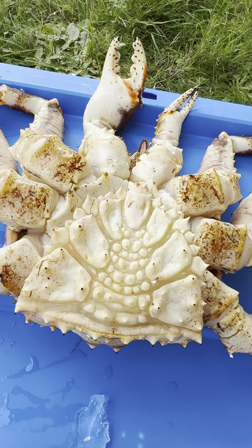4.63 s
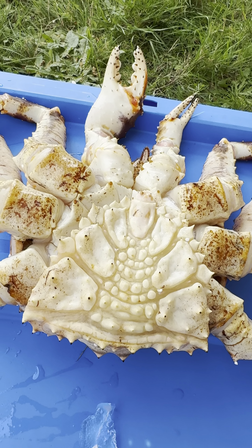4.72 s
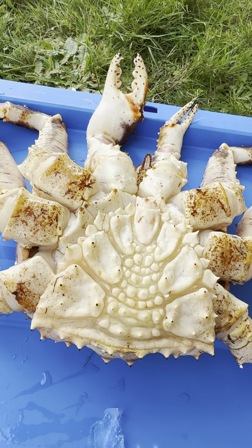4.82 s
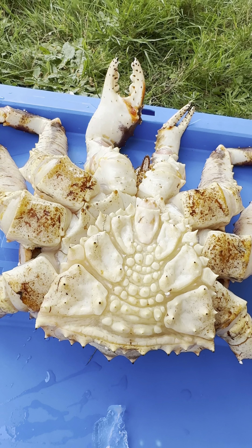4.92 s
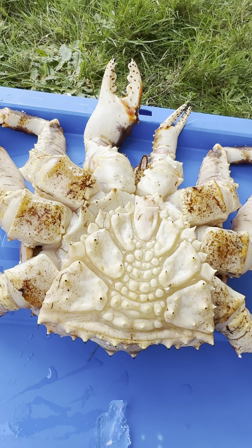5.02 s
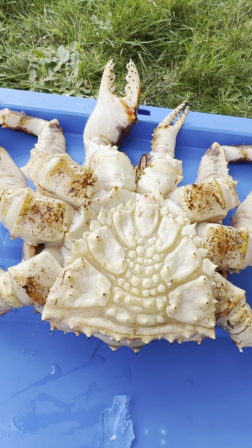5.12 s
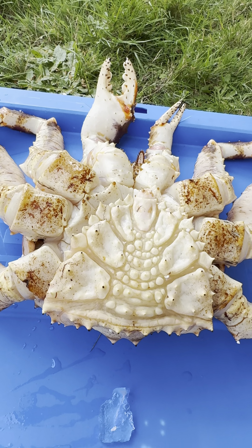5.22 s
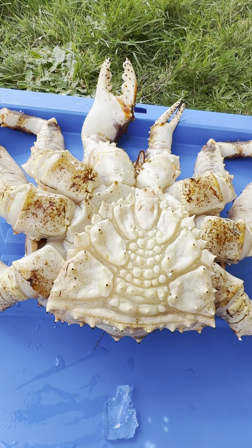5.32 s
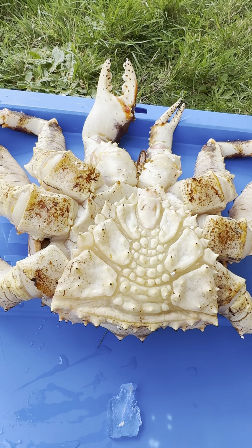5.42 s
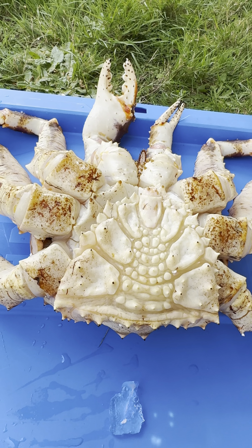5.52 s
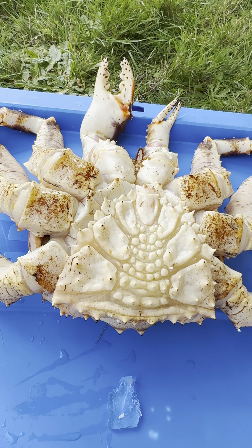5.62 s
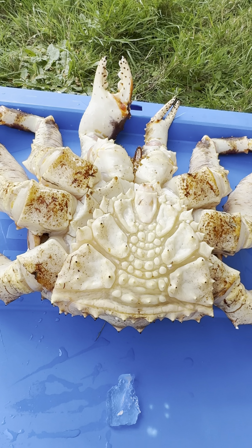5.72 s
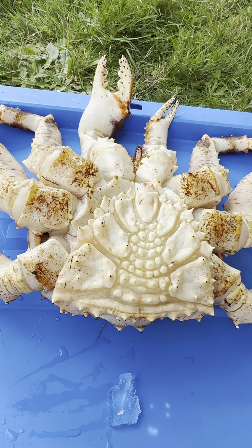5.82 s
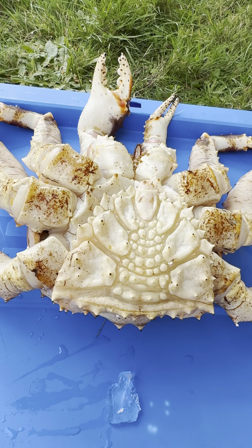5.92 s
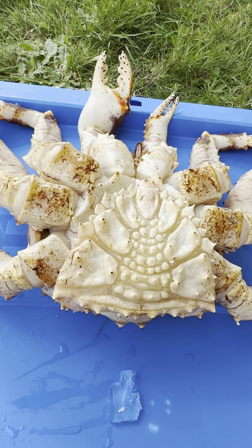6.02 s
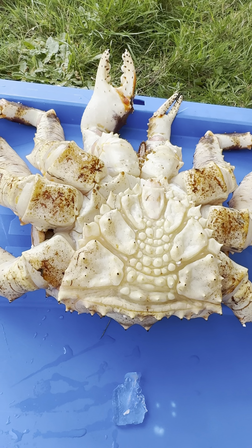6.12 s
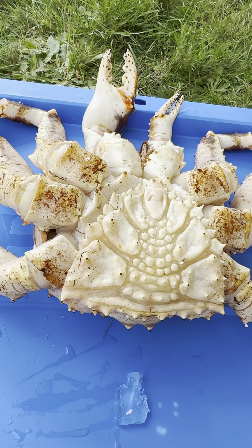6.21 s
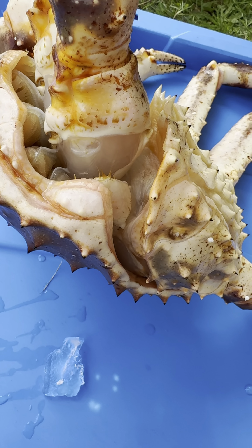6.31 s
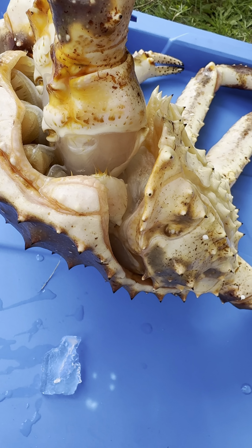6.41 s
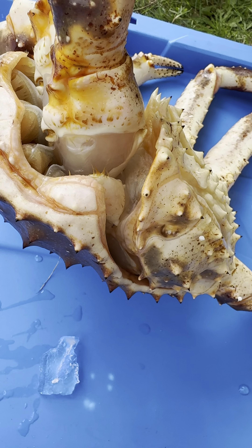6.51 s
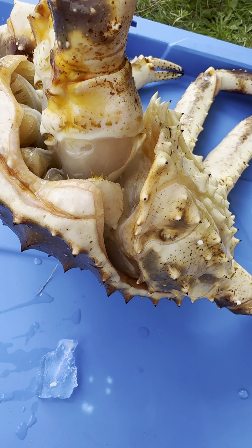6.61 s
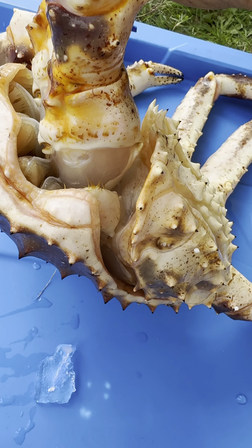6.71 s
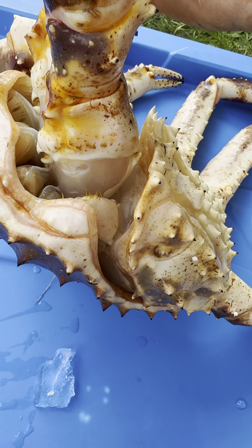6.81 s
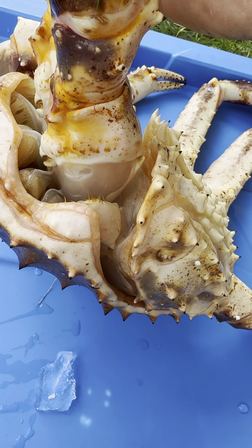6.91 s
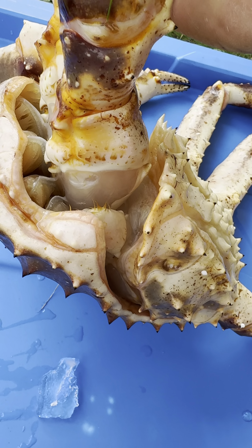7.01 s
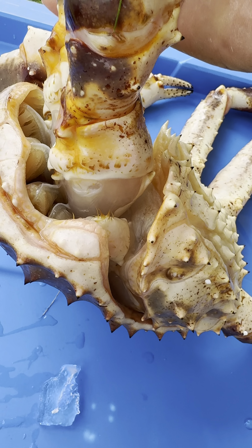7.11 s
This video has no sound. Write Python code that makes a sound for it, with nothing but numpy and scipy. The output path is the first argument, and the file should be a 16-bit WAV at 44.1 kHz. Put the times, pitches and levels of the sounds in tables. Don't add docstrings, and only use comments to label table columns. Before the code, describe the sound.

A loud shell knock opens, followed by more clustered knocks and gritty spine scrapes on a plastic tub, the heaviest near one second. A squeaky rub on the rim follows, then mostly quiet with delicate snaps and wet crackle. Brief softer knocks return after four seconds, bright ticks later. Close stereo phone pickup in open air, low steady machine drone, light hiss and tiny distant bird chips.

```python
import sys
import numpy as np
from scipy import signal
from scipy.fft import rfft, irfft, next_fast_len
from scipy.io import wavfile
from scipy.ndimage import uniform_filter1d, map_coordinates

SR = 44100
rng = np.random.default_rng(int(sys.argv[2]) if len(sys.argv) > 2 else 0)


def store_pcm(level_fs):
    pcm = np.round(np.clip(level_fs, -1, 1) * 32767).astype(np.int16)
    wavfile.write(sys.argv[1], SR, np.atleast_2d(pcm).T)


def field_ratio(decibels):
    return 10 ** (np.asarray(decibels, dtype=float) / 20)


N = 315756


def unit(x):
    return x / np.sqrt(np.mean(x ** 2) + 1e-20)


def along(points, hz):
    point_hz, value = np.transpose(points)
    return np.interp(np.log(hz + 1), np.log(np.abs(point_hz) + 1), value)


def wobble(rate_hz):
    knots = rng.standard_normal(int(N * rate_hz / SR) + 4)
    return map_coordinates(knots, [np.arange(N) * rate_hz / SR])


def filtered(x, response):
    m = next_fast_len(N + 8192)
    return irfft(rfft(x, m) * response(np.fft.rfftfreq(m, 1 / SR)), m)[..., :N]


def resonances(modes, f, scatter_db=0, turn=-1):
    gains = field_ratio(np.transpose(modes)[2] + scatter_db)
    total = 0
    for k, ((hz, width_hz, _), gain) in enumerate(zip(modes, gains)):
        damping = 1j * f * width_hz
        total = total + turn ** k * gain * damping / (hz * hz - f * f + damping)
    return total


def grit(per_s, spread_db):
    slips = (rng.random(N) < per_s / SR) * rng.standard_normal(N)
    return unit(slips * field_ratio(spread_db * rng.exponential(size=N)))


# centre in Hz, narrow width in Hz, wide width in Hz.
WALL_NODES = [(773, 45, 146), (3130, 260, 400), (1640, 110, 147), (483, 37, 100)]


def wall_path(f):
    bend_s, top_hz = .14, 1250
    bend = np.minimum(f, top_hz)
    lag = 4 * np.pi * bend_s * (np.sqrt(bend) - bend / 2 / np.sqrt(top_hz))
    gaps = 1
    for hz, narrow_hz, wide_hz in WALL_NODES:
        off = hz * hz - f * f
        gaps = gaps * (off + 1j * f * abs(narrow_hz)) / (off + 1j * f * abs(wide_hz))
    return gaps, lag


def struck(f, modes, scatter_db, turn):
    above = 1j * f / (1.14 * modes[-1][0])
    below = 1j * f / (.75 * modes[0][0])
    contact = (below / (1 + below)) ** 2 / (1 + 1.2 * above + above ** 2) ** 3
    return resonances(modes, f, scatter_db, turn) * contact


# start in seconds, peak in dB, floor in dB, rim in dB, shell in dB.
KNOCKS = [(0.023, -20.5, -8, -33, -37), (0.0468, -3.5, -18.5, -5.5, -6), (0.0565, -17, -13, 0, -5),
          (0.062, -39, -0.5, -9, -21), (0.2985, -10.5, -16, 6.5, 3.5), (0.317, -35, -8, 13, 9.5),
          (0.898, -18, -10, -12, -15.5), (0.912, -8.5, -14, -24, -15), (0.918, -18, -2, -4, -26),
          (1.010, -21, -0.5, 6.5, -18), (1.029, -14, -6.5, -0.5, -7), (1.041, -21.5, -3, -22, -26),
          (1.1106, -24, -26, 2, -6), (1.153, -25, -3.5, -3.5, -29), (1.175, -26.5, -17, -27, -24),
          (1.8008, -15.5, -34, 0, -9.5), (1.9495, -25.5, -32, -3.5, -21), (4.096, -20.5, -5, -10, -27.5),
          (4.119, -32, -15, 1.5, -18), (4.611, -30.5, -4, 1, -15), (4.651, -24, -8, 0, -14),
          (4.6571, -14.5, -14, -9, -9.5), (4.6739, -21.5, -5.5, -3, -14), (0.560, -52, -20, -10, -16),
          (0.0511, -13, -16, -18, -25), (1.1129, -27, -20, 3, -2), (0.9135, -15, -7, -10, -13),
          (4.099, -26, -5, -6, -28)]
# low over high side mode in dB, low over high rim mode in dB, paths through wall.
KNOCK_SPOTS = [(-25, -3, 0.682), (-4, 15, 1.06), (5, 7, 0.89), (-16, -9, 0.91), (-5, -4, 1.6),
               (-3, -5, 1.05), (16, -1, 0.666), (34, 7, 0.705), (-4, -11, 0.723), (11, 1, 0.915),
               (-10, -15, 0.711), (4, -2, 0.94), (-9, -10, 0.67), (26, -13, 0.665), (-8, 4, 0.644),
               (2.5, -28, 0.548), (-13, -11, 0.44), (7.5, -2, 1.106), (4, 3, 0.92), (13, -11, 0.92),
               (-16, 2, 0.733), (6, 13, 0.902), (2, -7, 0.916), (-13, -10, 0.41), (12, 4, 0.417),
               (-11, 2, 0.464), (-1, 2, 0.403), (5, 7, 0.416)]
# start in seconds, peak in dB, spine
# tips in dB.
TOUCHES = [(0.31, -31.5, -39), (0.561, -59.5, 15), (1.685, -42, -23), (1.704, -36.5, -22), (2, -50, -24),
           (1.761, -41, -7), (2.604, -60, 12), (4.096, -37.5, -2), (4.102, -23, -38), (4.109, -32, -43),
           (4.616, -37, -21), (4.734, -40.5, -29), (0.051, -43, -3), (0.066, -44, -1), (0.319, -43, 3.5),
           (0.919, -35, -5), (0.966, -30, -20), (0.9705, -32, -19), (1.001, -41, -5), (1.031, -29, 0),
           (1.056, -20, -13), (1.1534, -41.5, -9), (1.7103, -44, -10), (1.715, -41, -23), (1.74, -49, -30),
           (1.758, -49, -6), (4.66, -36, -6.5), (4.675, -41, -9), (4.707, -48, -12)]
TOUCH_SPOT = (0.1, 0.11, 0.821)
# centre in Hz, width in Hz, gain in dB.
SIDES = [(333, 200, -4.5), (665, 200, -2.5)]
FLOOR = [(80, 80, -1.5), (146, 200, -2), (250, 244, -0.5)]
RIM = [(912, 390, 3), (1353, 230, 1)]
SHELL = [(1930, 270, 7.5), (2400, 140, 3), (2646, 75, -1.5)]
TIPS = [(3450, 110, -8), (3900, 190, 5), (4580, 210, 10), (5660, 310, 8.5), (6300, 250, -5),
        (6940, 300, 3.5), (7430, 170, 5), (8100, 140, -13), (9000, 320, -12)]


def knocks():
    size = 4096
    out = np.zeros(N + size)
    f, t = np.fft.rfftfreq(size, 1 / SR), np.arange(size) / SR
    gaps, lag = wall_path(f)
    # (modes, dB, t60 s, sign from mode to mode)
    parts = ((SIDES, -1.5, .07, 1), (FLOOR, 4, .2, -1), (RIM, .1, .05, -1), (SHELL, 2.5, .045, 1),
             (TIPS, 6, .035, 1))
    blows = [(*row, -26.5 + .64 * row[-1]) for row in KNOCKS]
    blows += [(s, db, -5, -9.5, 5.5 + .59 * tip_db, tip_db) for s, db, tip_db in TOUCHES]
    spots = KNOCK_SPOTS + [TOUCH_SPOT] * len(TOUCHES)
    for (s, db, *strengths_db), (side_db, rim_db, path) in zip(blows, spots):
        when, force = rng.random((2, 4, 1))
        echoes = field_ratio(-8) * (2 * force - 1) * np.exp(-2j * np.pi * f * (.001 + .007 * when))
        spines = 1 + np.sum(echoes, axis=0)
        late = gaps * spines * np.exp(-1j * abs(path) * lag)
        tilts_db = (side_db, 0, rim_db, 0, 0)
        for (modes, part_db, t60_s, turn), own_db, tilt_db in zip(parts, (0, *strengths_db), tilts_db):
            spread_db = 4 if modes is TIPS else 1.2
            scatter_db = rng.normal(0, spread_db, len(modes)) + tilt_db * np.linspace(.5, -.5, len(modes))
            ring = irfft(struck(f, modes, scatter_db, turn) * late, size) * field_ratio(-60 * t / t60_s)
            out[round(s * SR):][:size] += field_ratio(db + part_db + own_db) * ring / np.abs(ring).max()
    return out[:N]


def stroke(s, rise_s, fall_s):
    gain = np.zeros(N)
    first = max(round((s - 4 * abs(rise_s)) * SR), 0)
    last = min(round((s + 4 * abs(fall_s)) * SR), N)
    at = np.arange(first, last)
    away = np.maximum((s - at / SR) / abs(rise_s), (at / SR - s) / abs(fall_s))
    gain[at] = field_ratio(-22.5 * np.abs(away) ** 1.14)
    return gain


# peak in seconds, rise in seconds,
# fall in seconds, level in dB, sharpness in dB.
SCRAPES = [(0.002, 0.0068, 0.013, -33, -9.5), (0.03, 0.037, 0.065, -37.5, -28),
           (0.089, 0.027, 0.05, -43, -6.5), (0.145, 0.04, 0.029, -44, -4.5),
           (0.297, 0.011, 0.0024, -24, -4), (0.33, 0.0086, 0.1, -56, 8), (0.968, 0.029, 0.033, -33.5, 0),
           (0.982, 0.027, 0.038, -38, 3), (0.996, 0.021, 0.03, -39, 4), (1.008, 0.03, 0.02, -30, 3),
           (1.018, 0.016, 0.012, -34.5, 1), (1.046, 0.0045, 0.018, -36, 5),
           (1.059, 0.0097, 0.01, -30.5, -4.5), (1.184, 0.078, 0.0084, -36.5, -28),
           (1.72, 0.031, 0.034, -41, -11), (1.762, 0.03, 0.074, -54, 10), (1.819, 0.068, 0.054, -36, -10.5),
           (4.127, 0.0045, 0.052, -34, -22), (4.16, 0.027, 0.061, -48, -29), (4.496, 0.03, 0.043, -65, 15),
           (4.543, 0.032, 0.073, -54, -1), (4.617, 0.033, 0.058, -38.5, -13.5),
           (4.69, 0.011, 0.036, -38, -21), (4.88, 0.031, 0.24, -67, 9)]
# peak in seconds, rise in seconds, fall in seconds, level in dB.
LIP_RUBS = [
    (1.689, 0.023, 0.015, -59),
    (1.757, 0.048, 0.052, -27.5),
    (1.81, 0.027, 0.042, -35),
    (1.933, 0.031, 0.0057, -40),
    (1.947, 0.0041, 0.0034, -33),
    (2.003, 0.0087, 0.029, -47),
]
# centre in Hz, width in Hz, gain in dB.
DRAG_SIDES = [(347, 107, 2), (495, 62, 3.5), (638, 240, 2.5)]
DRAG_RIM = [(930, 117, 5), (1372, 200, 5.5)]
DRAG_SHELL = [(1790, 306, 4.5), (2056, 264, 6), (2570, 590, 1), (3184, 450, -1)]
DRAG_TIPS = [(3820, 320, 9), (4335, 260, 9.5), (5400, 2400, 10), (7650, 22000, 1)]
LIP = [(584, 99, -3.5), (750, 87, -1.5), (1310, 160, -10)]


def scrapes():
    slips = unit(grit(6000, spread_db=2.0) * field_ratio(1.45 * wobble(90)))
    gains = np.zeros((5, N))
    for s, rise_s, fall_s, db, sharp_db in SCRAPES:
        parts_db = np.array([0, -1.5, sharp_db, -14.5 + .68 * sharp_db])
        gains[:-1] += field_ratio(db + parts_db)[:, None] * stroke(s, rise_s, fall_s)
    for s, rise_s, fall_s, db in LIP_RUBS:
        gains[-1] += field_ratio(db) * stroke(s, rise_s, fall_s)
    out = np.zeros(N)
    for modes, gain in zip((DRAG_SIDES, FLOOR, DRAG_RIM + DRAG_SHELL, DRAG_TIPS, LIP), gains):
        steady, played = filtered(np.array([slips, gain * slips]), lambda f: resonances(modes, f) ** 2)
        out += played / steady.std()
    return out


# start in seconds, peak in dB, swing in Hz.
THUDS = [
    (0.063, -17.5, 89),
    (0.912, -12, 90.5),
    (1.04, -21, 80),
    (1.051, -26, 49.7),
    (1.17, -26, 70),
    (4.108, -32.5, 87),
    (4.671, -29, 70),
]


def thuds():
    out, t = np.zeros(N + SR), np.arange(SR // 4) / SR
    t60_s, onset_s = .067, .01
    for s, db, hz in THUDS:
        swing = np.sin(2 * np.pi * hz * t) * (1 - np.exp(-t / onset_s))
        out[round(s * SR):][:len(t)] += field_ratio(db + 11.5 - 60 * t / t60_s) * swing
    return out[:N]


# frequency in Hz, t60 in seconds.
HOLLOW_T60 = [(100, 0.015), (500, 0.18), (2000, 0.12), (4000, 0.15), (9000, 0.064)]


def hollow(x):
    out, step = np.zeros((2, N + SR)), SR // 4
    for start in range(0, N, step):
        hz, t, z = signal.stft(rng.standard_normal((2, step)), SR, nperseg=256)
        decay = field_ratio(-60 * t / along(HOLLOW_T60, hz)[:, None])
        tail = signal.istft(z * decay, SR, nperseg=256)[1]
        wet = signal.fftconvolve(x[None, start:start + step], tail / np.linalg.norm(tail[0]), axes=1)
        out[:, start + 300:][:, :wet.shape[1]] += wet
    return out[:, :N]


# start in seconds, peak in dB, top band in dB.
TICKS = [(0.4868, -56, -22), (0.5457, -58, -17), (0.561, -54, -18), (0.911, -28, -37), (1.053, -45, -10),
         (1.06, -48, -15), (1.067, -52, -11), (1.292, -65, -6), (1.496, -62, -9), (1.522, -59, -13),
         (1.5519, -59, -8), (1.623, -46.5, -21), (2.1537, -56, -18), (2.2974, -58, -23), (2.605, -50, -29),
         (2.9484, -57, -21), (3.2205, -59, -17), (3.382, -58, -12), (3.5954, -60, -15), (4.098, -56, -7),
         (5.3708, -49, -27), (5.3735, -52, -17), (5.3829, -42.5, -22), (5.3862, -38, -19),
         (5.393, -44, -25), (5.515, -55, -41), (6.4688, -51, -17), (6.547, -59, -35), (6.696, -64, -7),
         (6.843, -55.5, -9), (6.899, -52, -13), (7.07, -57, -11), (0.049, -39, -21), (0.1132, -68, -18),
         (0.3, -55, -19), (0.6455, -57, -16), (1.6313, -48, -24), (1.768, -72, -21), (1.825, -62, -22),
         (4.109, -58, -13), (6.4409, -60, -13), (6.651, -59, -16), (6.765, -62, -16), (7.1148, -65, -11)]


def ticks():
    size = 400
    body, top, t = np.zeros(N + size), np.zeros(N + size), np.arange(size) / SR
    for s, db, top_db in TICKS:
        snap = rng.standard_normal(size) * field_ratio(-60 * t / 0.0029)
        snap /= np.linalg.norm(snap) / 6.6
        body[round(s * SR):][:size] += field_ratio(db + 6.5) * snap
        top[round(s * SR):][:size] += field_ratio(db + top_db + 25.5) * snap
    body_modes = [(6700, 4000, 0.0063)]  # (Hz, width Hz, dB)
    top_modes = [(10760, 6500, 1), (13000, 2500, 0), (15000, 2500, -2.0)]
    low = filtered(body[:N], lambda f: resonances(body_modes, f) ** 2)
    high = filtered(top[:N], lambda f: resonances(top_modes, f) ** 2)
    return low + high


# start in seconds, length in seconds, level in dB, wet share in dB.
RUBS = [(0.39, 0.87, -71, 5), (1.03, 0.5, -81, 8), (1.423, 0.55, -79, 9), (2.09, 0.56, -81, -10),
        (3.204, 0.16, -77, -8), (3.35, 0.16, -74, -7), (3.506, 0.68, -82, 9), (5.363, 0.036, -69, -13),
        (6.418, 0.077, -82, -6), (6.736, 0.18, -80, -9), (6.895, .15, -80, -8)]


def rustle():
    slips, t = grit(5000, spread_db=2) * field_ratio(3 * wobble(30)), np.arange(N) / SR
    crackle = unit(filtered(slips, lambda f: resonances([(9500, 9000, 0)], f) ** 2))
    drops = grit(5300, spread_db=-1.5)
    wet = unit(filtered(drops, lambda f: resonances([(3900, 2500, 0)], f) ** 2))
    out = np.zeros(N)
    for s, length_s, db, wet_db in RUBS:
        edge_s = .29 * length_s
        shape = np.clip(np.minimum(t - s, s + length_s - t) / edge_s, 0, 1)
        out += field_ratio(db + 9) * shape * (crackle + field_ratio(wet_db) * wet)
    return out


# centre in seconds, peak in dB, pitch in Hz, length in seconds.
CHIPS = [
    (2.385, -58, 4600, .02),
    (2.997, -57, 4650, .02),
    (6.455, -66, 4700, .025),
    (6.98, -58, 3250, .05),
    (7.115, -65, 6200, .04),
]


def bird():
    half = SR // 20
    out, t = np.zeros(N + SR), np.arange(-half, half) / SR
    for s, db, hz, length_s in CHIPS:
        husk = uniform_filter1d(rng.standard_normal((2, len(t))), size=120, axis=1)
        tone = np.real((1 + 7 * (husk[0] + 1j * husk[1])) * np.exp(2j * np.pi * hz * t))
        out[round(s * SR) - half:][:len(t)] += field_ratio(db - 1) * np.exp(-8 * (t / length_s) ** 2) * tone
    return out[:N] * field_ratio(np.array([[2], [-2]]))


# frequency in Hz, correlation.
PORT_LIKENESS = [(100, .99), (250, .85), (600, .75), (1200, .7), (2400, .35), (4300, .45), (4950, .75),
                 (5400, .6), (6300, .9), (8300, .93), (10500, .985), (13300, .985), (14500, .8)]


def rush(shape, patchy_db):
    z = signal.stft(rng.standard_normal((2, N)), nperseg=512)[2]
    field = uniform_filter1d(rng.standard_normal(z.shape[1:]), size=6, axis=0)
    field = uniform_filter1d(field, size=14, axis=1)
    pair = signal.istft(z * field_ratio(patchy_db * unit(field)), nperseg=512)[1][:, :N]

    def spread(hz):
        turn = np.arccos(np.clip(along(PORT_LIKENESS, hz), -1, 1)) / 2
        return shape(hz) * np.array([np.cos(turn), np.sin(turn)])

    same, apart = filtered(pair, spread)
    return unit(np.array([same + apart, same - apart]))


# pitch in Hz, rms in dB, wander in Hz.
HUM = [(69.7, -72, 2), (90.7, -51, 5.16), (119.2, -44.5, 1.216), (145.9, -51.5, 0.67), (221, -58.5, 1.05),
       (244.6, -55, 1.45), (364, -63, 0.99)]


def hum():
    out = np.zeros(N)
    for hz, db, wander_hz in HUM:
        level_db = db + .67 * wobble(2.755) + 2.5 * wobble(15)
        pitch_hz = hz + wander_hz * wobble(6) + .018 * hz * wobble(20)
        phase = 2 * np.pi * np.cumsum(pitch_hz) / SR + 7 * rng.random()
        out += np.sqrt(2) * field_ratio(level_db) * np.sin(phase)
    return out


# time in seconds, gain in dB.
SWELL = [(0, 1.5), (.35, 1), (.6, 0.5), (.9, 6.5), (1.04, 10.5), (1.25, 1.5), (1.8, 3.5), (2.2, 1.5),
         (3.4, 3), (4, 2), (5.1, 1.5), (6.4, 1.5), (7.16, 2.5)]
# frequency in Hz, density in dB per Hz.
DRONE = [(25, -28), (35, -10.5), (45, 2.5), (70, 7.5), (110, -1), (180, -9), (260, -8), (285, -13.5),
         (350, -15), (480, -26.5), (570, -16), (800, -19.5), (1100, -25.5), (1400, -39.5), (2000, -120)]
AIR = [(710, -15.5), (1200, 4.5), (1310, -1.5), (1430, 1.5), (1520, -0.5), (2000, -3.5), (2520, -5),
       (3200, -9), (4290, -8), (4950, -10.5), (5500, -14), (7320, -22.5), (12600, -30), (14800, -31.5),
       (16200, -59)]


def background():
    t = np.arange(N) / SR
    swell_db = np.interp(t, *np.transpose(SWELL))
    low = lambda hz: 1 / (1 + (hz / 130) ** 4)
    rumble_db = -57 + 1.5 * t + 2.2 * wobble(7.4)
    rumble = field_ratio(rumble_db) * rush(lambda hz: field_ratio(along(DRONE, hz)) * np.sqrt(low(hz)), patchy_db=-1.0)
    drone_shape = lambda hz: field_ratio(along(DRONE, hz)) * np.sqrt(1 - low(hz))
    drone = field_ratio(-45.5 + swell_db) * rush(drone_shape, patchy_db=2.0)
    air = field_ratio(-59 + .39 * swell_db) * rush(lambda hz: field_ratio(along(AIR, hz)), patchy_db=.5)
    return rumble + drone + air + hum()


def ports(pair, lead, tilt):
    half = lambda hz: field_ratio(along(tilt, hz) / 2) * np.exp(.5j * along(lead, hz))
    return filtered(pair, lambda hz: np.array([half(hz), 1 / half(hz)]))


# frequency in Hz, left lead in radians.
NEAR_LEAD = [(100, 0), (300, -.45), (600, -.9), (1200, -1.3), (2000, 1.2), (3300, 1), (4800, -1.2),
             (8000, -1.3), (10900, -2.6), (13300, -2.5), (14300, -1.9)]
FAR_LEAD = [(100, 0), (220, -.1), (430, -1.3), (950, -2.1), (2400, -2.2), (3300, -2.1), (4900, -3),
            (5600, -1.2), (6500, -.2), (8300, -.5), (10700, -3.14), (13700, -3.14), (14600, -1.8)]
# frequency in Hz, left over right in dB.
NEAR_TILT = [(60, 0), (130, 1), (300, 2.5), (600, -1.5), (1200, -4), (2400, 2.5), (4800, 1.5), (8000, 0)]
FAR_TILT = [(60, 1.5), (110, 2), (200, 3.5), (380, 7.5), (700, 1.5), (1300, 2), (2400, 1), (8000, 0)]


def scene():
    tub = knocks() + scrapes() + thuds()
    near = tub + field_ratio(-16.0) * hollow(tub) + ticks()
    far = background() + bird() + rustle()
    return ports(near, NEAR_LEAD, NEAR_TILT) + ports(far, FAR_LEAD, FAR_TILT)


def roll_off(x):
    return signal.sosfilt(signal.butter(12, 16830, fs=SR, output="sos"), x)


def record(dry):
    top_hz, roll_hz, bass_hz, ceiling = 15900, 150, 30, 1.4

    def band(hz):
        treble = np.clip((top_hz - hz) / roll_hz / 2 + .5, 0, 1) ** 2
        return treble * (1j * hz / (bass_hz + 1j * hz)) ** 2

    heard = filtered(dry, band)
    mix = heard / (1 + np.abs(heard / ceiling) ** 4) ** .25
    return roll_off(mix)


dry = scene()
out = record(dry)
store_pcm(out)
```